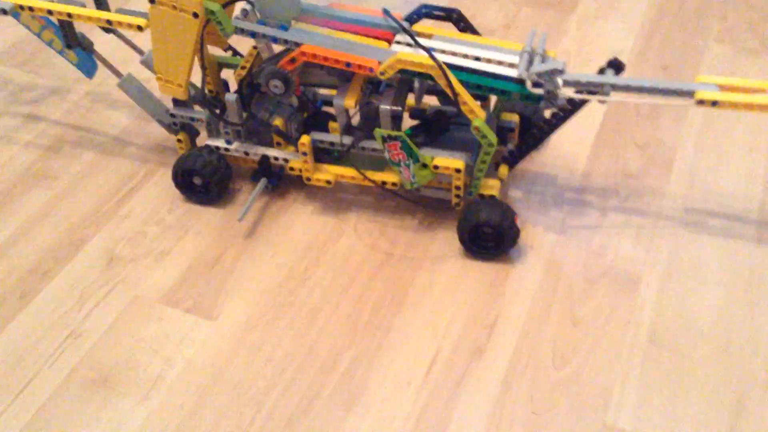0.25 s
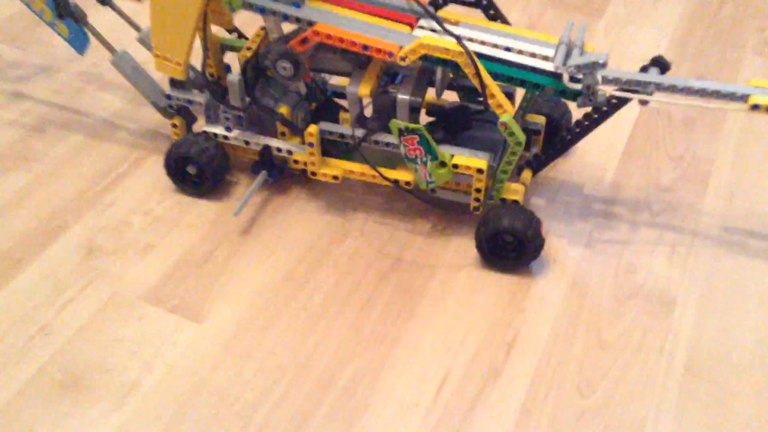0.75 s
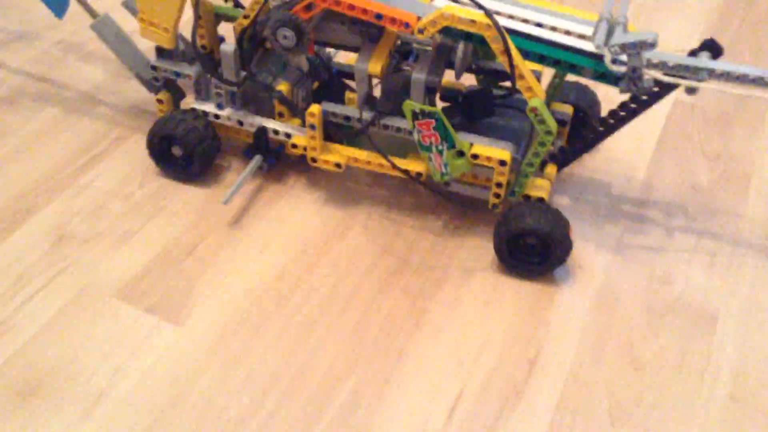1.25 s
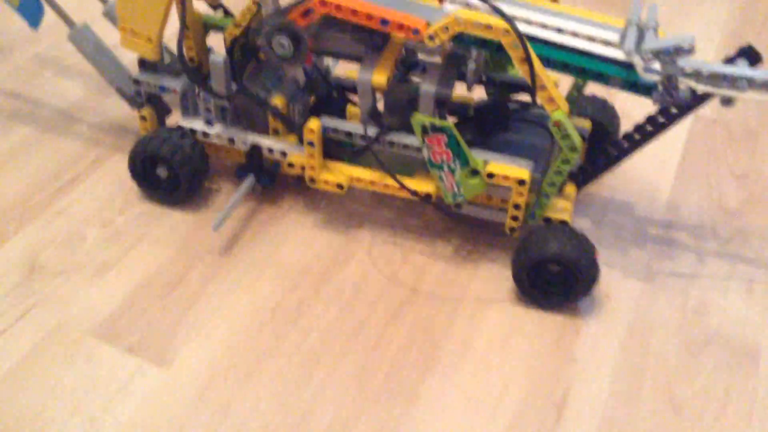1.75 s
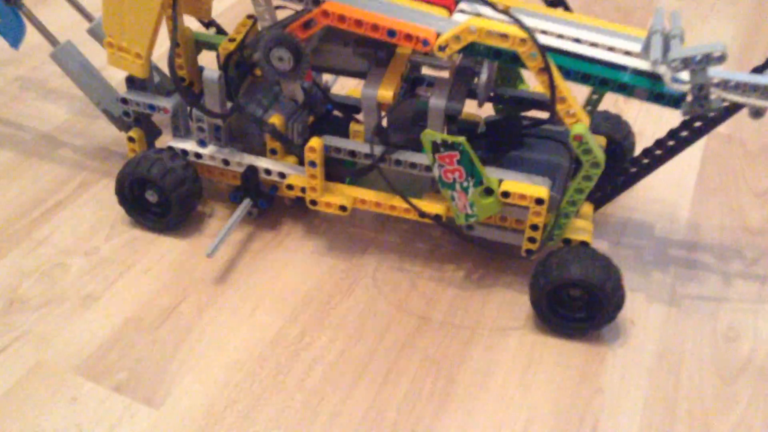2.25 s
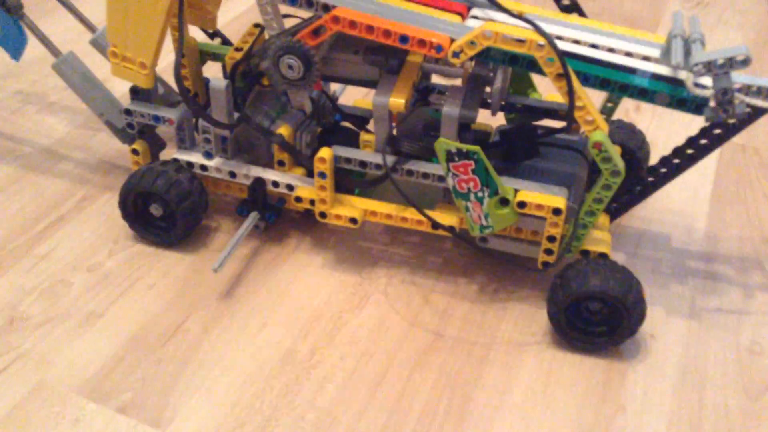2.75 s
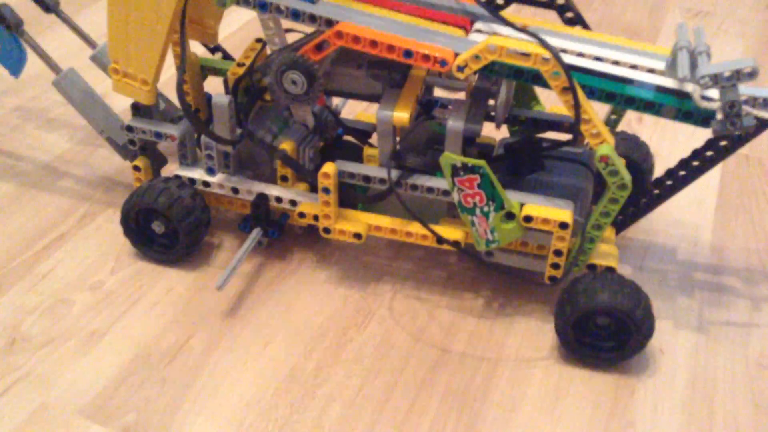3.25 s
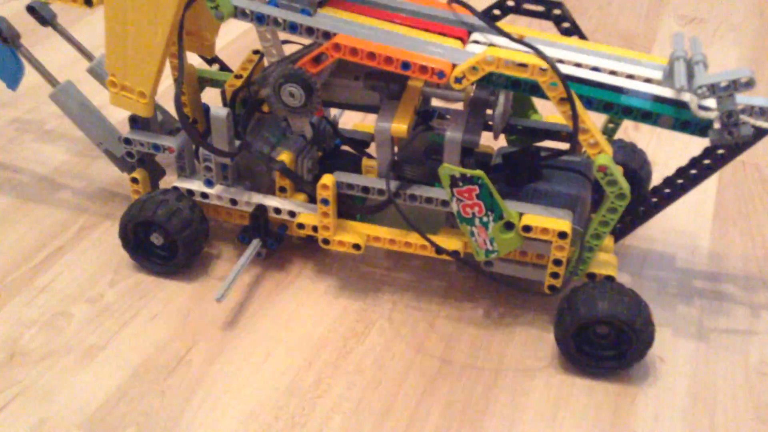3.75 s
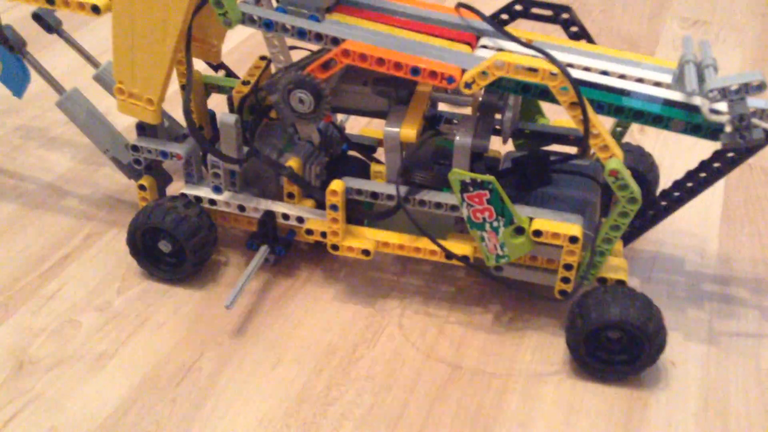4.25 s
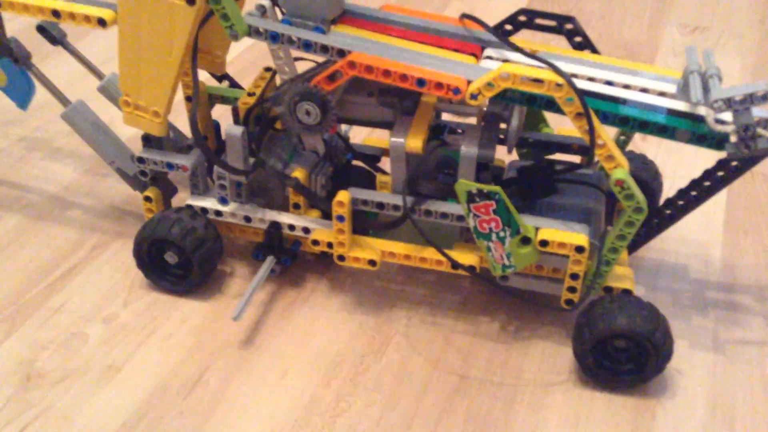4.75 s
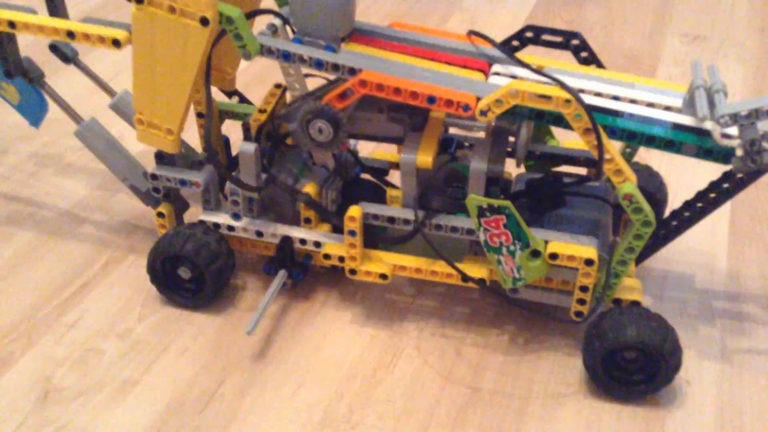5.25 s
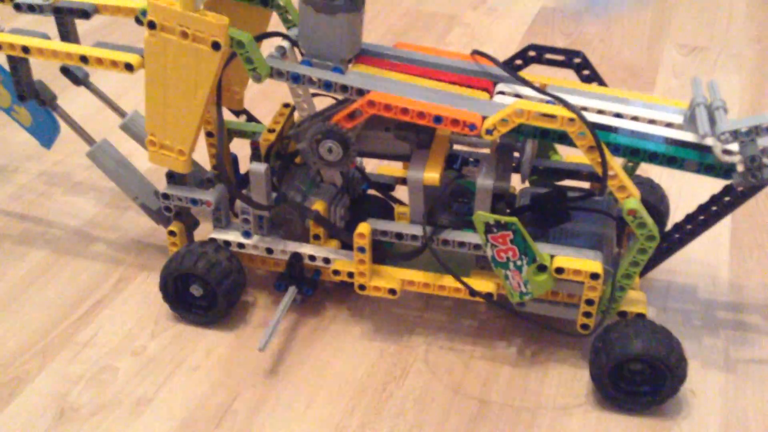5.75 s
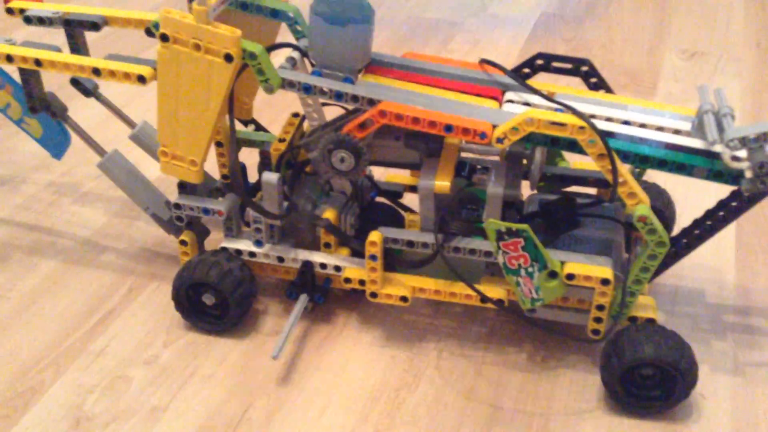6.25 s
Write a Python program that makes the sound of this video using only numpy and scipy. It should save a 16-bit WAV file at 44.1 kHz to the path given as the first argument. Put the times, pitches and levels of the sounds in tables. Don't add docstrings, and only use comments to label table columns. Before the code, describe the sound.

Fast uneven plastic clatter and steady hissing gears from a motorised toy, treble dulled for the first second, then sharp and near.

```python
import sys
import numpy as np
from scipy import signal
from scipy.fft import rfft, irfft, next_fast_len
from scipy.io import wavfile

SR = 44100
rng = np.random.default_rng(int(sys.argv[2]) if len(sys.argv) > 2 else 0)


def put_to_file(sound):
    columns = np.atleast_2d(sound).T
    safe = np.clip(columns, -1, 1)
    whole_steps = np.round(safe * 32767)
    wavfile.write(sys.argv[1], SR, whole_steps.astype(np.int16))


def gain_from_db(level_db):
    decades = np.asarray(level_db, float) / 20
    return 10 ** decades


N = 287091
FIRST_S, KNOCKS_PER_S = .0131, 29.552


def rms_one(x):
    return x / np.sqrt(np.mean(x ** 2) + 1e-20)


def resonate(x, hz, width_hz):
    r = np.exp(-np.pi * width_hz / SR)
    top = np.array([1, 0, -1]) * (1 - r * r) / 2
    bottom = [1, -2 * r * np.cos(2 * np.pi * hz / SR), r * r]
    return signal.lfilter(top, bottom, x + 1e-18)


def grit(shape, per_s, spread_db):
    size_db = spread_db * np.minimum(rng.exponential(1, shape), 5)
    sizes = gain_from_db(size_db) * rng.choice([-1, 1], shape)
    return rms_one(sizes * (rng.random(shape) < per_s / SR))


def drift(per_s):
    r = np.exp(-2 * np.pi * per_s / SR)
    wander = signal.lfilter([1], [1, -2 * r, r * r], rng.standard_normal(N + SR))
    return rms_one(wander[SR:])


# (pitch [Hz], level [dB per Hz])
GEAR_COLOUR = [(76, -107), (130, -32.5), (325, -30), (1260, -24.5), (2070, -18.5), (2480, -19),
               (2970, -15.5), (4790, -12), (5730, -7.5), (8030, 1), (11700, -7), (13800, -15.5),
               (15200, -15)]


def gears(grain_share, flutter_db):
    smooth = np.sqrt(1 - grain_share) * rng.standard_normal(N)
    grains = np.sqrt(grain_share) * grit(N, per_s=6000, spread_db=2.5)
    flutter = gain_from_db(flutter_db * drift(per_s=120))
    size = next_fast_len(N)
    hz, level_db = np.transpose(GEAR_COLOUR)
    bin_hz = np.arange(size // 2 + 1) * SR / size
    colour = gain_from_db(np.interp(np.log(bin_hz + 1), np.log(hz), level_db))
    hiss = irfft(rfft((smooth + grains) * flutter, size) * colour, size)[:N]
    return gain_from_db(-23) * rms_one(hiss)


# (pitch [Hz], width [Hz], level [dB])
CASINGS = [(323, 54, -69), (714, 29, -71), (1170, 19, -66.5), (1443, 38, -72), (2094, 47, -57),
           (2690, 66, -50)]


def motors():
    noise = rng.standard_normal(N)
    hum = np.zeros(N)
    for hz, width, db in CASINGS:
        ring = resonate(resonate(noise, hz, width), hz, width)
        hum += gain_from_db(db) * rms_one(ring)
    return hum


# (time [s], body change [dB], tooth change [dB])
UNUSUAL_BLOWS = [(.045, -3.1, .5), (.18, -2, 1), (.655, -3.5, -6), (1.129, 2.5, 3), (.994, 2, 3.5),
                 (1.57, -4, -9), (1.603, 1, -0.5), (1.976, 2.5, 4), (2.043, 2.1, 3), (2.382, -1.5, -11),
                 (2.788, 2.5, 2), (3.059, 1, 1), (3.228, 0.5, -2), (3.499, 1, -7.2), (3.567, -0.5, 2.6),
                 (3.702, 3, 1), (3.736, 1.2, 0), (3.972, -0.5, -2), (4.108, 1, 3.5), (4.175, -0.5, 1.7),
                 (4.277, -0.2, -1), (4.784, -4, 2.5), (5.089, 0.5, -1), (5.258, -1.5, -2), (5.393, -7, 1.5),
                 (5.596, 2.5, 0), (5.732, 2.5, 3.9), (5.765, 1, 0), (5.934, -5, -8.6), (6.306, -1, -1)]


def harder(beat):
    change_db = rng.standard_normal((len(beat), 2)) * [0.5, 0.5]
    odd = np.array(UNUSUAL_BLOWS)
    knock = np.round((odd[:, 0] - FIRST_S) * KNOCKS_PER_S).astype(int)
    change_db[knock] = odd[:, 1:]
    return change_db.T


# (start [ms], tooth delay [ms], bounce delay [ms], bounce level [dB])
BLOW_TIMING = [
    (0, .8, 13.5, -14),
    (-.3, .5, 2.5, -4),
    (-.4, .9, 7.8, -12),
    (.2, .3, 6.5, -13),
    (-.5, .5, 2.4, -2),
    (-.2, .3, 2.7, -12),
]


def blows(part, lobe, length, sameness, rattle_db, rattle_t60):
    n = np.arange(1400)
    bounce_ms, bounce_db = np.array(BLOW_TIMING)[lobe, 2:].T[:, :, None]
    bounce_at = (bounce_ms + 0.29 * rng.standard_normal(bounce_ms.shape)) * SR / 1000
    since = n - bounce_at
    push = np.exp(-n / length)
    push += gain_from_db(bounce_db) * (since >= 0) * np.exp(-np.abs(since) / length)
    push += gain_from_db(rattle_db - 60 * n / (rattle_t60 * SR)) * np.sqrt(length / 50)

    worn = grit((len(LOBE_BLOWS), len(n)), per_s=14000, spread_db=2.5)[lobe]
    fresh = grit((len(lobe), len(n)), per_s=9000, spread_db=1.5)
    alike = np.clip(sameness, 0, 1) * (n < 200)
    force = push * (np.sqrt(alike) * worn + np.sqrt(1 - alike) * fresh)

    spot_db = 2.1 * rng.standard_normal((len(part), len(lobe), 1))
    rung = np.zeros(force.shape)
    for j, (hz, width, db) in enumerate(part):
        rung += (-1) ** j * gain_from_db(db + spot_db[j]) * resonate(force, hz, width)
    rung = signal.lfilter(*signal.butter(2, 11000, fs=SR), rung)
    return rung / np.sqrt(np.mean(rung[:, :220] ** 2, axis=1, keepdims=True))


# (time [s], lag [ms])
CRANK_LAG = [
    (0, -2.1),
    (.69, -1.1),
    (1.37, -.1),
    (2.38, .1),
    (3.23, .5),
    (4.07, .2),
    (5.43, 0),
    (6.51, -1.1),
]
# (contact length [ms], frame [dB], beam [dB], link [dB], tooth [dB])
LOBE_BLOWS = [
    (1.1, -45, -31.5, -25.5, -18.5),
    (1.6, -43, -38, -28, -26),
    (1.2, -46.5, -31.5, -26, -21.5),
    (2.4, -41, -36, -25, -20),
    (0.53, -43.5, -40, -27.5, -25),
    (1.1, -40.5, -37, -26.5, -22),
]
# (pitch [Hz], width [Hz], level [dB])
FRAME_RING = [(690, 970, -12), (1050, 160, -2.5), (1420, 69, -1), (1740, 157, 5), (2100, 550, 0)]
BEAM_RING = [(2990, 360, 20.5), (2800, 370, -18), (3120, 110, -7.5)]
LINK_RING = [(4034, 680, -5), (4690, 600, 0.5), (5300, 880, -3), (5840, 340, -6)]
TOOTH_RING = [(6350, 760, -5), (7920, 1150, 3), (9190, 2120, 0), (11970, 2100, -9.5)]
KNOCK_AWAY = [-0.4, -2, -1.5, 0]


def crank(lift_db):
    beat = np.arange(FIRST_S, N / SR, 1 / KNOCKS_PER_S)
    lobe = np.arange(len(beat)) % len(LOBE_BLOWS)
    rows = np.array(LOBE_BLOWS)[lobe]
    start_ms, tooth_ms = np.array(BLOW_TIMING)[lobe, :2].T
    lag_ms = np.interp(beat, *np.transpose(CRANK_LAG))
    at_s = beat + (lag_ms + start_ms) / 1000
    length_db = -2.3 + 1.3 * rng.standard_normal((len(beat), 1))
    length = np.clip(rows[:, :1], .2, 6) * SR / 1000 * gain_from_db(length_db)
    body_db, tooth_db = harder(beat)
    s, away, _ = np.transpose(MIC_AIM)
    turned_away = np.interp(beat, s, away)

    out = np.zeros(N + 2000)
    for k, part in enumerate([FRAME_RING, BEAM_RING, LINK_RING, TOOTH_RING]):
        is_tooth = k == 3
        delay_s = tooth_ms / 1000 if is_tooth else 0
        harder_db = tooth_db if is_tooth else body_db
        starts = ((at_s + delay_s) * SR).astype(int)
        rung = blows(part, lobe, length, sameness=0.58, rattle_db=-11.5, rattle_t60=0.082)
        level_db = rows[:, k + 1] + harder_db + KNOCK_AWAY[k] * turned_away
        places = starts[:, None] + np.arange(rung.shape[1])
        np.add.at(out, places, gain_from_db(level_db)[:, None] * rung)
    return out[:N] * gain_from_db(lift_db)


# (time [s], turned away [0 to 1], tipped up [-1 to 1])
MIC_AIM = [(0.0, 0.61, 0.024), (0.22, 0.67, -1.1), (0.52, 0.97, -0.16), (0.85, 0.97, 0.2), (1.33, 0.6, -.3),
           (1.46, 0.42, -0.084), (1.65, 0.25, 0.16), (2.3, 0.1, 1), (2.65, 0, 0.8), (3.5, 0.05, 0.4),
           (4.4, 0, -0.045), (6.51, 0.03, -0.92)]
AIM_HZ = [2400, 5400, 6800, 8700, 10480, 13200, 14800]
AWAY_CHANGE = [-2, -6, -6.5, -23, -13, -1, 2.5]
TIPPED_CHANGE = [0.1, -0.16, -0.7, -2, 1.5, 2, 0.7]
SETTLE_CHANGE = [0.1, 2.1, 5, 8.8, 7.8, 6, 6]


def turning_microphone(x):
    hz, times, spec = signal.stft(x, SR, nperseg=128)
    s, away, tipped = np.transpose(MIC_AIM)

    def at_each_pitch(change_db):
        return np.interp(np.log(hz + 1), np.log(AIM_HZ), change_db)[:, None]

    gain_db = at_each_pitch(AWAY_CHANGE) * np.interp(times, s, away)
    gain_db += at_each_pitch(TIPPED_CHANGE) * np.interp(times, s, tipped)
    gain_db += at_each_pitch(SETTLE_CHANGE) * np.exp(-times / 0.056)
    return signal.istft(spec * gain_from_db(gain_db), SR, nperseg=128)[1][:N]


# (time [s], level [dB], pitch [Hz], width [Hz])
HAND_BUMPS = [
    (1.401, -46, 206, 90),
    (1.513, -52, 191, 90),
]


def bumps():
    out = np.zeros(N)
    for s, db, hz, width in HAND_BUMPS:
        t = np.maximum(np.arange(N) / SR - s, 0)
        swell = np.pi * width * t * np.exp(1 - np.pi * width * t)
        out += gain_from_db(db) * np.sin(2 * np.pi * hz * t) * swell
    return out


def scene():
    machine = gears(grain_share=0.36, flutter_db=1.0) + crank(lift_db=1.5)
    mono = turning_microphone(machine) + motors() + bumps()
    return np.array([mono, mono])


def top_cut(x):
    return signal.sosfilt(signal.butter(12, 16620, fs=SR, output="sos"), x)


def record(dry):
    mix = np.clip(dry, -.7, .7)
    return top_cut(mix)


dry = scene()
out = record(dry)
put_to_file(out)
```